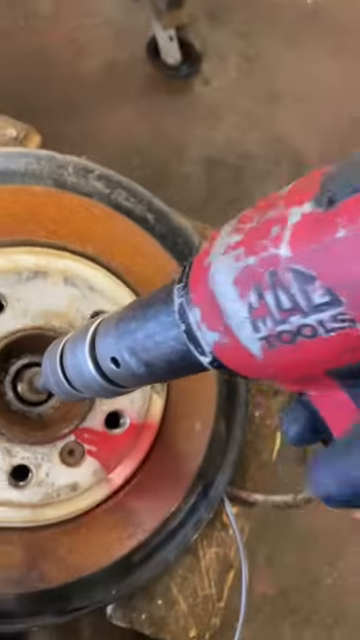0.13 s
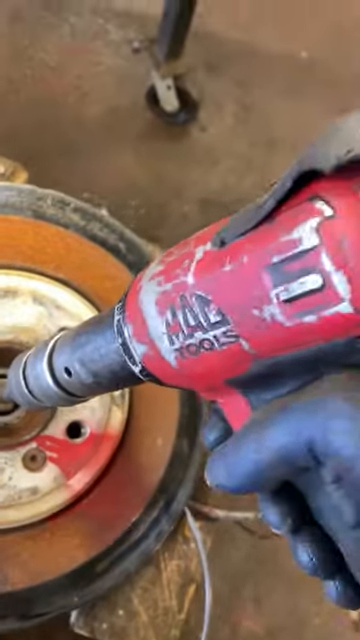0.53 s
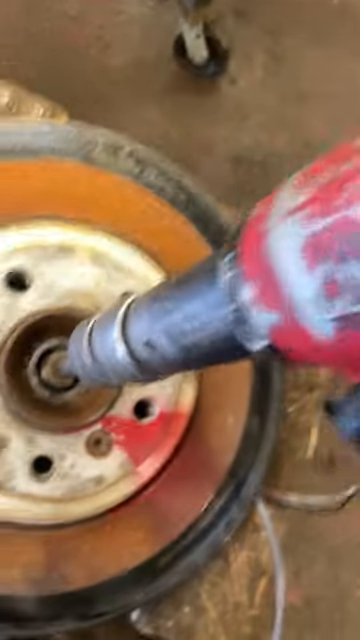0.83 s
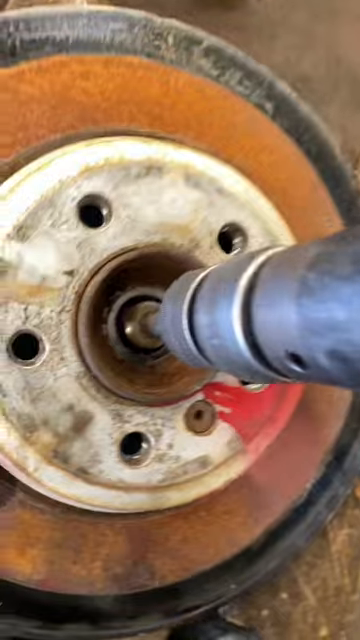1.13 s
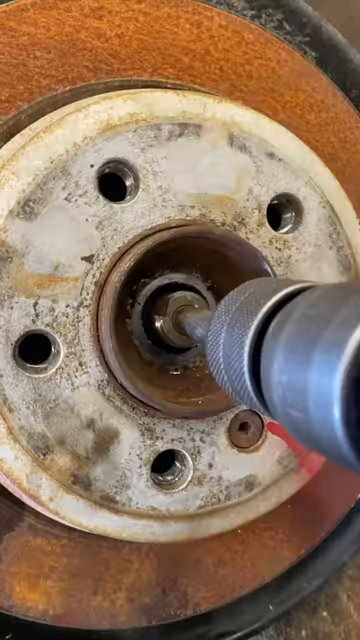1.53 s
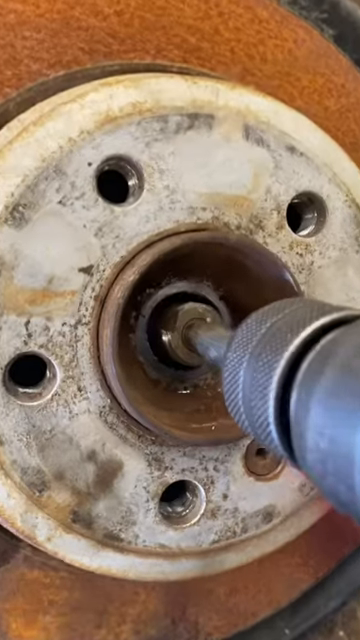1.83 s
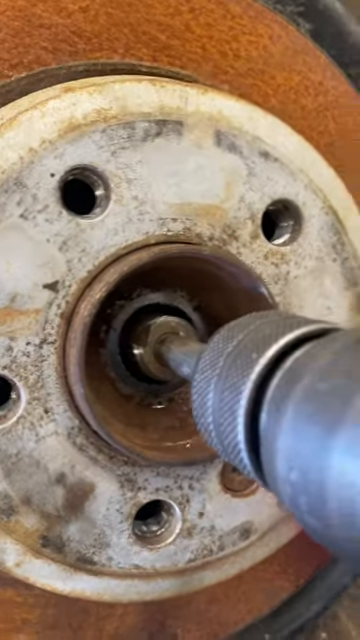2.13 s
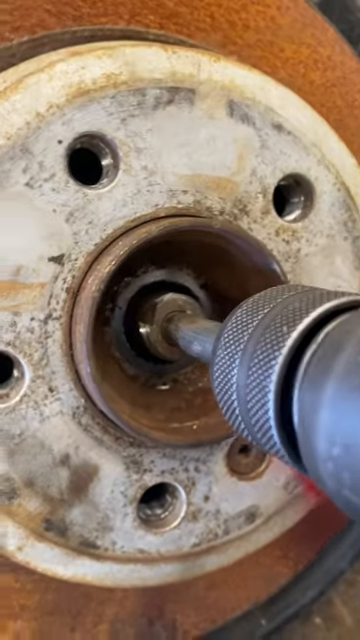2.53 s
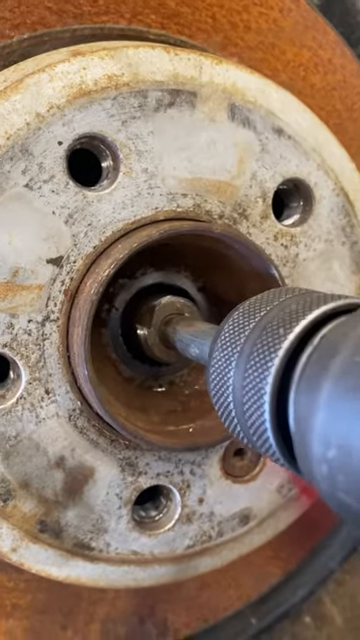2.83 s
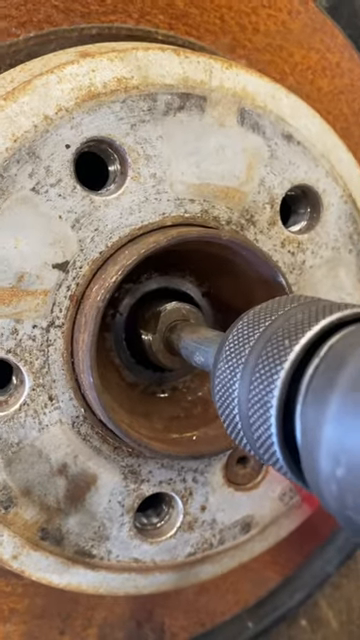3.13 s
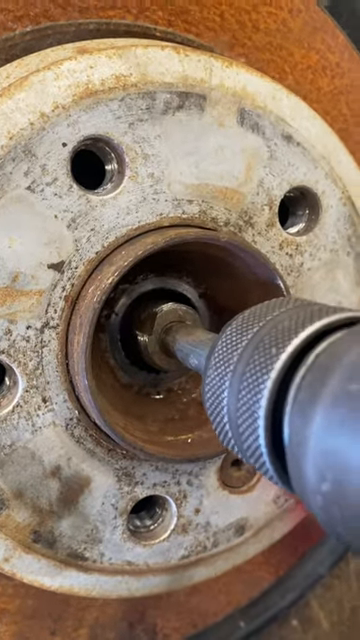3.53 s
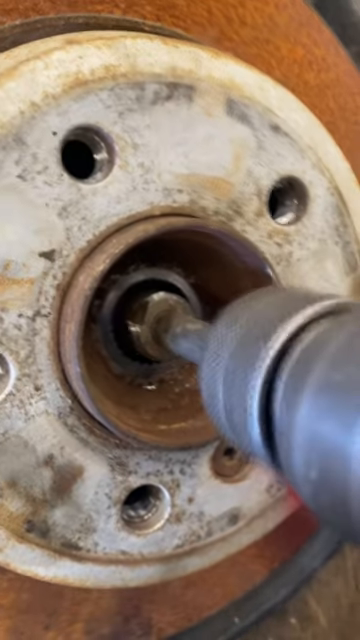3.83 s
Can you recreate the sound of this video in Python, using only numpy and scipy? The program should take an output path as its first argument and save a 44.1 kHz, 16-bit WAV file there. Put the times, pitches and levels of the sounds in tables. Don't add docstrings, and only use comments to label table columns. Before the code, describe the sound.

An air hammer strikes a wheel hub only at the end. From 0 to 3.5 seconds, low duct rumble, a wavering fan hum and faint hiss hold, with soft glove and hose rubs, firmest around 0.5-0.9, and a clear tick near 1.2. At 3.6 a brief air whistle and puff lead into loud blows, about forty per second, with thuds, ringing steel and exhaust bursts, cutting off mid-run at 4.

```python
import sys
import numpy as np
from scipy import signal
from scipy.fft import rfft, irfft
from scipy.io import wavfile
from scipy.ndimage import uniform_filter1d

SR = 44100
rng = np.random.default_rng(int(sys.argv[2]) if len(sys.argv) > 2 else 0)


def magnitude_from_level(level_db):
    exponent = np.asarray(level_db, float) / 20
    return 10 ** exponent


def output_pcm(signal):
    pcm = np.clip(np.atleast_2d(signal).T, -1, 1) * 32767
    wavfile.write(sys.argv[1], SR, np.round(pcm).astype(np.int16))


N = 176400
QUIET_UNTIL_S = 3.5


def evened(x):
    return x / np.sqrt(np.mean(x ** 2) + 1e-20)


def read(points, hz):
    f, value = np.transpose(points)
    return np.interp(np.log(hz + 1), np.log(f + 1), value)


def curve(points):
    return np.interp(np.arange(N) / SR, *np.transpose(points))


def shaped(x, gain):
    return irfft(rfft(x) * gain(np.fft.rfftfreq(x.shape[-1], 1 / SR)), x.shape[-1])


def noise():
    return rng.standard_normal((2, N))


def rings(peaks, hz):
    power = 0
    for centre_hz, width_hz, db in peaks:
        power = power + magnitude_from_level(2 * db) / width_hz / (1 + (2 * (hz - centre_hz) / width_hz) ** 2) ** 2
    return np.sqrt(power)


def wander(shape, smooth_s):
    size = max(int(smooth_s * SR), 1)
    once = uniform_filter1d(rng.standard_normal(shape), size)
    return evened(uniform_filter1d(once, size))


def peaked(peak_s, db, rise, fall):
    late = np.arange(N) / SR - peak_s
    return magnitude_from_level(db + np.where(late < 0, rise * late, -fall * late))


# (time [s], exhaust [dB], thud [dB], thud tilt [dB per octave], rebound [dB])
BLOWS = [(3.604, -9.5, -10.5, 3.5, -19), (3.6277, -16, -10.5, 0.5, -3), (3.6505, -8, -11.5, 2, -14),
         (3.6625, -20, -11, -3, -23), (3.682, -7, -13, 0, -7), (3.7087, -12.5, -8, -0.5, -15),
         (3.7351, -9.5, -15.5, -0.5, -10.5), (3.761, -8.5, -11.5, 0, -1.5), (3.7853, -9, -13.5, -1, -9),
         (3.8105, -8, -15, 2, -10.5), (3.8362, -13, -18, -1, -14), (3.8605, -12, -15, 0, -15),
         (3.8866, -12, -14, 1, -3), (3.9116, -10.5, -17.5, 4.5, -8), (3.9365, -14, -13.5, 0, -10.5),
         (3.9577, -10.5, -24, -2.5, -11), (3.9834, -11, -14.5, -1.5, -17)]
# (frequency [Hz], level [dB per Hz])
EXHAUST_COLOUR = [(300, -12), (600, -5), (1300, -7.5), (2000, -4), (4000, -7.5), (8000, -7.5), (13000, -12),
                  (16000, -11)]


def exhaust():
    exhaust_db, open_s, spit_db = -5.5, 0.0018, 2
    first_db, sag_db_per_s = -10, -330
    crack_db, crack_s = 3.5, 0.0035
    full_stroke_s, shut_lead_s = .018, .0085
    shut_db, shut_above_hz = -17, 3900
    t, times = np.arange(N) / SR, np.array(BLOWS)[:, 0]
    nexts = np.append(times[1:], 2 * times[-1] - times[-2])
    k = np.clip(np.searchsorted(times, t) - 1, 0, None)
    age = abs(t - times[k])
    level = np.array(BLOWS)[k, 1] + first_db * (k == 0) + sag_db_per_s * age
    flow = (t > times[0]) * magnitude_from_level(level + crack_db * np.exp(-age / crack_s))
    shut = (nexts[k] - times[k] > full_stroke_s) & (t > nexts[k] - shut_lead_s)
    smooth = max(int(open_s * SR), 1)
    air = noise() * magnitude_from_level(spit_db * wander(N, 0.0005))
    air = evened(shaped(air, lambda hz: magnitude_from_level(read(EXHAUST_COLOUR, hz)) * (hz > 300)))
    top = shaped(air, lambda hz: 1 / (1 + (shut_above_hz / (hz + 1)) ** 6))
    valve = uniform_filter1d(np.where(shut, magnitude_from_level(shut_db), 1.), smooth)
    return magnitude_from_level(exhaust_db) * uniform_filter1d(flow, smooth) * (air - top + top * valve)


# (frequency [Hz], level [dB per Hz])
THUD_COLOUR = [(20, 1), (70, 1.5), (155, 0.3), (300, 0), (550, -6.5), (900, -14), (1500, -30), (3000, -54)]
# (frequency [Hz], level [dB], time to fall 60 dB [s])
HUB = [(1627, -7, 0.048), (1710, -2.5, 0.047), (2047, -5, 0.11), (2279, -8, 0.12), (2550, -11.5, .09),
       (2786, -11, 0.063), (3410, -11.5, 0.094), (3870, -8, 0.054), (4400, -10.5, 0.055),
       (5220, -13, 0.032), (5480, -7.5, 0.036)]


def steel():
    thud_db, lag_s, lag_ref_hz, lag_bend, lag_spread, lead_s = 3, 0.01547, 99.8, 0.808, 0.04, .0015
    colour_db, ripple = 1.5, 3.48
    rebound_s, rebound_spread = 0.00913, 0.055
    hub_db, hub_spread_db, first_ring_db, ring_rise_s = -5.5, 5, -17, 0.0041
    size = 8192
    out, t, hz = np.zeros((2, N + size)), np.arange(size) / SR, np.fft.rfftfreq(size, 1 / SR)
    draws = rng.standard_normal((len(BLOWS), 2, 2 * len(HUB) + 2))
    for (start, _, db, tilt, rebound_db), draw in zip(BLOWS, draws):
        lag = lag_s * (1 + lag_spread * draw[0, -1]) * (lag_ref_hz / (hz + 1)) ** lag_bend
        lag = np.minimum(lag, .06) - lead_s
        colour = read(THUD_COLOUR, hz) + tilt * np.log2(np.clip(hz, 50, 700) / 200)
        colour = colour + colour_db * np.sin(ripple * np.log(hz + 1) + 2 * np.pi * draw[1, -1])
        thud = irfft(magnitude_from_level(colour) * np.exp(-2j * np.pi * np.cumsum(lag) * hz[1]))
        thud = thud / abs(thud).max()
        late = round(rebound_s * (1 + rebound_spread * draw[0, -2]) * SR)
        thud = thud + magnitude_from_level(rebound_db) * np.roll(thud, late)
        ring = np.zeros((2, size))
        for m, (ring_hz, ring_db, t60) in enumerate(HUB):
            fade = magnitude_from_level(ring_db + hub_spread_db * draw[:, [2 * m]] - 60 * t / t60)
            ring += fade * np.sin(2 * np.pi * ring_hz * t + 2 * draw[:, [2 * m + 1]])
        ring *= magnitude_from_level(hub_db + first_ring_db * (start == BLOWS[0][0])) * np.minimum(t / ring_rise_s, 1)
        at = round(start * SR)
        out[:, at:at + size] += magnitude_from_level(db) * (magnitude_from_level(thud_db) * thud + ring)
    return out[:, :N]


# (frequency [Hz], width [Hz], level [dB])
INLET = [(490, 200, -5.5), (750, 600, -6), (1030, 81, 1.5), (2100, 170, -2.5), (2500, 200, -2),
         (3797, 160, 1.5), (5370, 140, -8), (9100, 1500, -7), (12200, 1500, -10), (14500, 1000, -10)]


def inlet():
    puff_low_hz, puff_high_hz = 5600, 13100
    whistle = evened(shaped(noise(), lambda hz: rings(INLET, hz)))
    puff = shaped(noise(), lambda hz: 1 / (1 + (puff_low_hz / (hz + 1)) ** 6)
                  / (1 + (hz / puff_high_hz) ** 12))
    whistle = whistle * peaked(3.612, -13.5, rise=1107, fall=1200)
    return whistle + puff * peaked(3.6225, -2.5, rise=1800, fall=3500)


# (frequency [Hz], level [dB rms])
DRUM = [(79, -25.5), (159, -26), (320, -35), (498, -39), (592, -31), (755, -40), (816, -41), (1160, -43)]


def drum():
    start_s, rise_s, waver_db, drift = 3.66, 0.088, 3.5, .012
    t, tones = np.arange(N) / SR, np.zeros(N)
    for hz, db in DRUM:
        level = magnitude_from_level(db + waver_db * wander(N, .012))
        turns = hz * np.cumsum(1 + drift * wander(N, 0.02015)) / SR
        tones += level * np.sin(2 * np.pi * turns)
    return np.sqrt(2) * np.clip((t - start_s) / rise_s, 0, 1) * tones


# (frequency [Hz], level [dB per Hz])
RUB_COLOUR = [(300, -10), (650, -4.5), (1500, -11.5), (3000, -20), (5000, -22), (8000, -24.5), (12000, -35),
              (16000, -37)]
# (frequency [Hz], width [Hz], level [dB])
RUB_RINGS = [(695, 180, 4), (1810, 130, -21.5), (2360, 180, -12), (2810, 170, -12.5), (4700, 47, -5.5),
             (5020, 90, -12), (5280, 150, -11), (6860, 150, -6.5), (10200, 1100, -10.5),
             (11750, 610, -10.5)]
# (start [s], rise [s], level [dB], fade [dB per s], tilt [dB per octave])
RUBS = [
    (0, 0.05, -43, 241, 2.5),
    (0.538, 0.068, -34, 78, 0.4),
    (.67, 0.051, -42.5, 78, -3),
    (.78, 0.068, -38.5, 50, -0.34),
    (1.28, 0.031, -43, 90, 1),
    (1.52, 0.059, -49.5, 50, 2),
    (1.94, 0.026, -51, 46, 1.7),
    (2.33, 0.059, -40.5, 61, -4.5),
    (3.06, 0.067, -45, 98, 1.2),
]
# (start [s], length [s], level [dB], frequency [Hz], width [Hz])
SCRAPES = [
    (0, 0.09, -51, 1600, 900),
    (0.532, 0.059, -50.5, 9500, 2500),
    (0.772, 0.15, -49, 2160, 1400),
    (0.586, .12, -58.5, 2700, 800),
    (.9, .2, -65, 5400, 150),
    (0.953, 0.085, -50, 905, 500),
    (1.155, .035, -47.5, 1700, 600),
    (1.934, 0.29, -57.5, 4800, 2000),
]
# (time [s], peak [dB])
TICKS = [
    (.325, -55),
    (1.194, -37.5),
]


def handling():
    grip_shift = 0.014
    ring_from_db, ring_span_db = -45, 15.5
    tick_t60_s, tick_low_hz = 0.011, 2500
    t, out = np.arange(N) / SR, np.zeros((2, N))
    grains = noise() * magnitude_from_level(1 * wander(N, 0.0022))
    cloth = evened(shaped(grains, lambda hz: magnitude_from_level(read(RUB_COLOUR, hz))))
    for start, rise, db, fade, tilt in RUBS:
        shift = 1 + grip_shift * rng.standard_normal()
        hollow = shaped(grains, lambda hz: 100 * rings(RUB_RINGS, hz / shift))
        firmness = np.clip((db - ring_from_db) / ring_span_db, 0, 1)
        shape = np.clip((t - start) / rise, 0, 1) * magnitude_from_level(db - fade * np.maximum(t - start - rise, 0))
        rub = shaped(cloth + firmness * hollow, lambda hz: magnitude_from_level(tilt * np.log2((hz + 100) / 1000)))
        out += shape * rub
    for start, length, db, centre_hz, width_hz in SCRAPES:
        stroke = np.sin(np.pi * np.clip((t - start) / length, 0, 1))
        scrape = evened(shaped(grains, lambda hz: rings([(centre_hz, width_hz, 0)], hz)))
        out += magnitude_from_level(db) * stroke * scrape
    snap = shaped(noise(), lambda hz: hz > tick_low_hz)
    return out + snap * sum((t > s) * magnitude_from_level(db - 60 * abs(t - s) / tick_t60_s) for s, db in TICKS)


# (frequency [Hz], level [dB])
HUM = [(260, -38), (522.2, -57.5), (716, -61), (1174, -64.5), (2342, -63.5)]
# (time [s], level [dB])
HUM_LEVEL = [(0, 7.5), (1, 4), (2, 0), (2.6, -1.6), (3.3, 0.2), (4, -0.5)]


def hum():
    waver_db, drift = 0.5, 0.0022
    turns = np.cumsum(1 + drift * wander(N, 0.062)) / SR
    tones = []
    for hz, db in HUM:
        level = magnitude_from_level(db + waver_db * wander(N, 0.082))
        tones.append(level * np.sin(2 * np.pi * (hz * turns + rng.random())))
    return np.sqrt(2) * (magnitude_from_level(curve(HUM_LEVEL)) * tones[0] + sum(tones[1:]))


# (frequency [Hz], level [dB per Hz])
AIR = [(15, -52), (25, -17), (48, -1), (263, -6), (340, -16), (500, -28), (800, -54.5)]
# (frequency [Hz], width [Hz], level [dB])
RUMBLE_PEAKS = [(60.8, 6.8, -6), (152, 39, -0.5)]
# (time [s], level [dB])
AIR_LEVEL = [(0, -32), (.5, -31), (1.5, -33), (2.5, -35), (4, -33)]
# (frequency [Hz], level [dB per Hz])
HISS = [(200, -15), (500, -2), (1000, -5), (2000, -9), (3200, -13), (5000, -16.5), (8000, -31),
        (16000, -26.5)]
# (frequency [Hz], width [Hz], level [dB])
BLOWER = [(349, 74, -1), (528, 183, 0.5), (783, 200, -8.5)]
# (time [s], level [dB])
BLOWER_LEVEL = [(0, -66), (.5, -45), (1.1, -47), (2.5, -45), (4, -41.5)]


def shop_air():
    hiss_db = -32
    wide = evened(shaped(noise(), lambda hz: magnitude_from_level(read(AIR, hz))))
    lumps = shaped(noise(), lambda hz: 100 * rings(RUMBLE_PEAKS, hz))
    hiss = shaped(noise(), lambda hz: magnitude_from_level(hiss_db + read(HISS, hz)) * (hz > 100))
    blower = evened(shaped(noise(), lambda hz: rings(BLOWER, hz)))
    rumble = magnitude_from_level(curve(AIR_LEVEL) + 0.75 * wander(N, 0.16)) * (wide + lumps)
    hiss = magnitude_from_level(1.0 * wander(N, 0.056)) * hiss
    return rumble + hiss + magnitude_from_level(curve(BLOWER_LEVEL) + 1.4 * wander(N, 0.04)) * blower


# (frequency [Hz], time to fall 60 dB [s])
ROOM_T60 = [(100, 0.37), (1000, 0.33), (5000, 0.13), (12000, 0.037)]


def room(x):
    room_db, dull_hz, gap_s = -10, 1500, .006
    hz, t, z = signal.stft(rng.standard_normal((2, SR // 2)), SR, nperseg=256)
    fade = (t > gap_s) * magnitude_from_level(-60 * t / read(ROOM_T60, hz)[:, None])
    dull = np.sqrt(1 + (hz[:, None] / dull_hz) ** 2)
    tail = signal.istft(z * fade / dull, SR, nperseg=256)[1]
    tail = tail / np.linalg.norm(tail[0]) / 2
    return x + magnitude_from_level(room_db) * signal.fftconvolve(x, tail, axes=1)[:, :N]


# (frequency [Hz], likeness [0 to 1])
SAME = [(100, 1), (350, 0.91), (900, 0.27), (1700, 0.69), (3000, 0.6), (4800, 0.24), (7000, 0.93),
        (15000, 0.84)]


def ports(x):
    def same(hz):
        return np.clip(read(SAME, hz), 0, 1)
    shared = shaped(x[0], same)
    return np.array([x[0], shared + shaped(x[1], lambda hz: np.sqrt(1 - same(hz) ** 2))])


def leaned(x, balance):
    return shaped(x, lambda hz: magnitude_from_level(np.outer([.5, -.5], read(balance, hz))))


# (frequency [Hz], left minus right [dB])
HAMMER_BALANCE = [(60, 2.5), (200, 0.5), (700, -3.5), (1100, -5), (1600, -0.5), (15000, 0)]
AIR_BALANCE = [(60, 0.65), (300, -1.5), (700, -2), (1500, 1.5), (3000, -0.3), (15000, 0.5)]


def scene():
    hammer = leaned(ports(room(exhaust() + inlet() + steel())), HAMMER_BALANCE)
    hammer = hammer * (np.arange(N) > QUIET_UNTIL_S * SR)
    background = leaned(ports(shop_air() + handling()) + hum(), AIR_BALANCE)
    return background + hammer + drum()


def above(hz, edge_hz):
    return .5 + .5 * np.tanh((hz - edge_hz) / 40)


def banded(x, bands):
    return shaped(x, lambda hz: magnitude_from_level(sum(db * (above(hz, lo) - above(hz, hi)) for lo, hi, db in bands)))


def low_pass(x):
    return signal.sosfilt(signal.butter(12, 17110, fs=SR, output="sos"), x)


# (frequency [Hz], lead [radians])
LEAD = [(0, 0), (1500, 0.18), (2800, 1.5), (5000, .5), (7300, 3), (10500, 6.5), (13400, 9), (16000, 11.5)]
# (low [Hz], high [Hz], level [dB])
WEAK_MID = [(6620, 7840, -5), (12840, 13000, -13), (14300, 16500, -7)]
WEAK_SIDE = [(9700, 11200, -14), (15200, 16500, -12)]
# (from [s], to [s])
STARVED = [
    (3.73, 3.76),
    (3.8, 3.885),
    (3.955, 4.1),
]
# (low [Hz], high [Hz], level [dB])
DROPPED = [(7050, 7800, -25), (13000, 14250, -30)]


def record(dry):
    clip, edge_hz = 1.24, 15820
    loud_db, loud_keep = -20, 0.56
    always_dropped = 0.44
    dry = np.pad(dry, [(0, 0), (0, 3600)], "linear_ramp", end_values=0)

    def lead(hz):
        return np.exp(.5j * np.outer([1, -1], np.interp(hz, *np.transpose(LEAD))))
    overloaded = clip * np.tanh(shaped(dry, lead) / clip)
    left, right = shaped(overloaded, lambda hz: 1 - above(hz, edge_hz))
    loudness = np.sqrt(abs(uniform_filter1d(left ** 2, size=1500))) / magnitude_from_level(loud_db)
    keep = np.clip(loud_keep * loudness - loud_keep, 0, loud_keep)
    mid, side = (left + right) / 2, (left - right) / 2
    mid = keep * mid + (1 - keep) * banded(mid, WEAK_MID)
    side = keep * side + (1 - keep) * banded(side, WEAK_SIDE)
    t = np.arange(len(mid)) / SR
    starved = uniform_filter1d(sum(1. * (t > a) * (t < b) for a, b in STARVED), size=200)
    starved = np.maximum(starved, always_dropped * (t > QUIET_UNTIL_S))
    mid = mid + starved * (banded(mid, DROPPED) - mid)
    return low_pass(np.array([mid + side, mid - side])[:, :N])


dry = scene()
out = record(dry)
output_pcm(out)
```